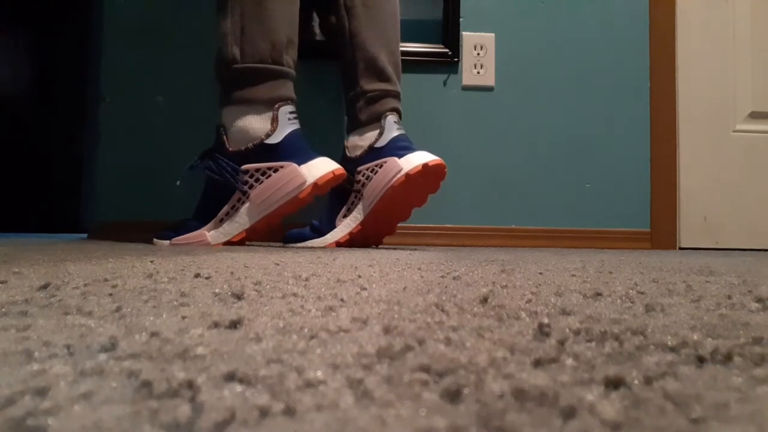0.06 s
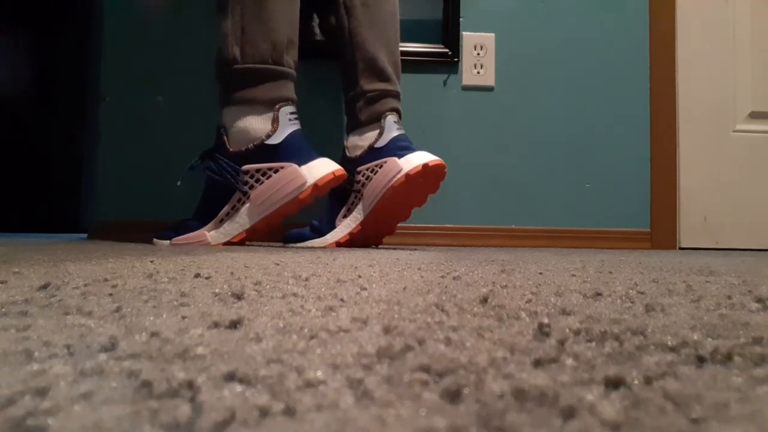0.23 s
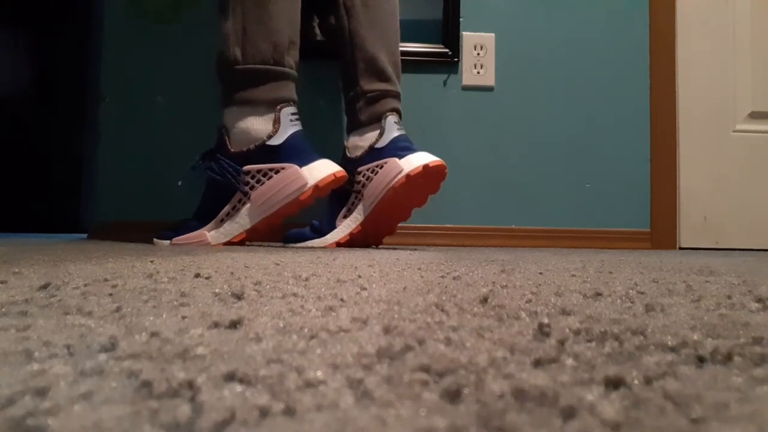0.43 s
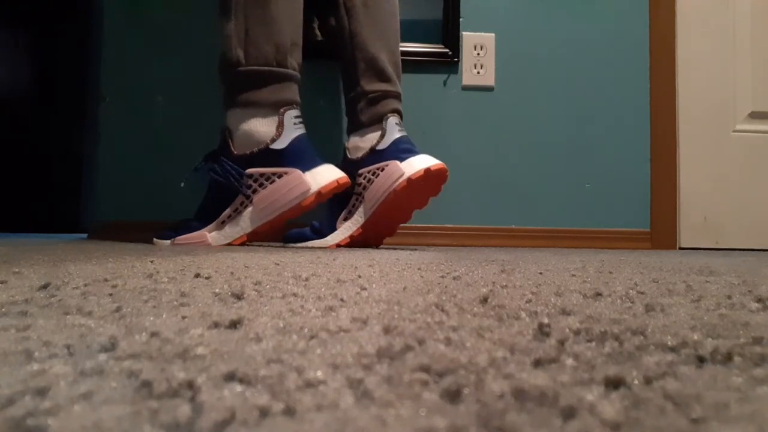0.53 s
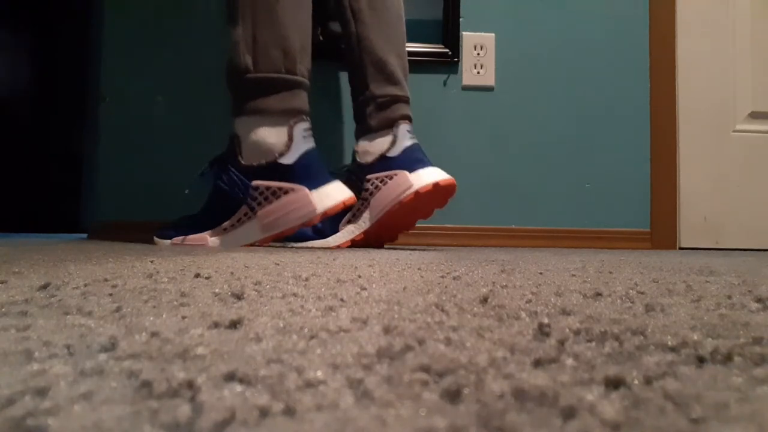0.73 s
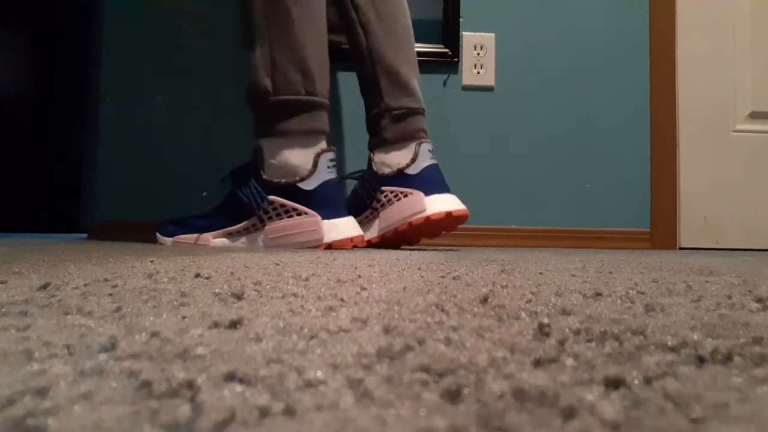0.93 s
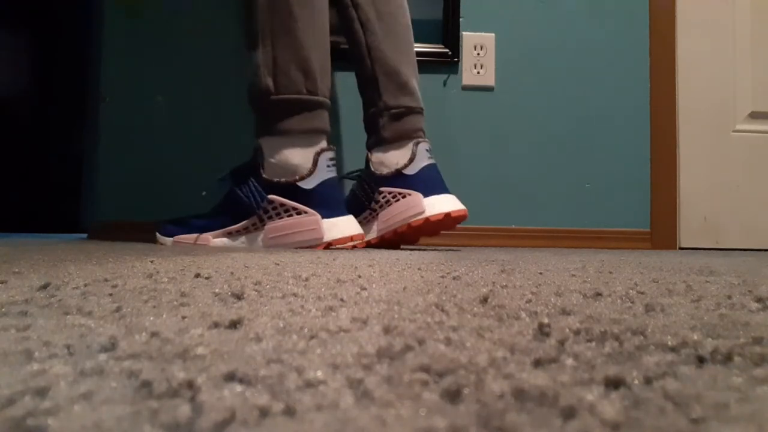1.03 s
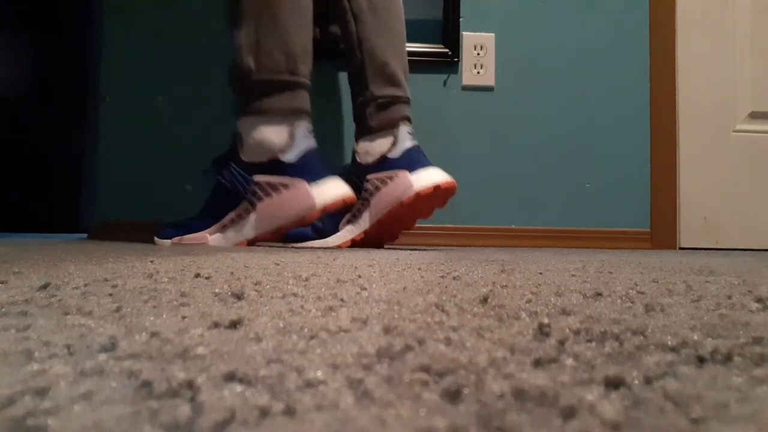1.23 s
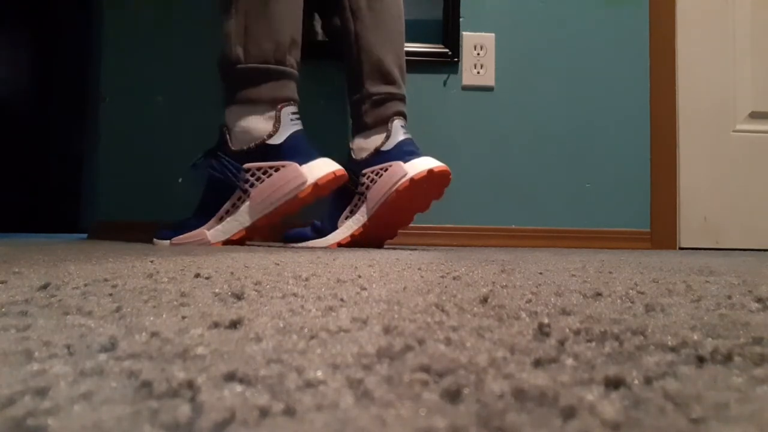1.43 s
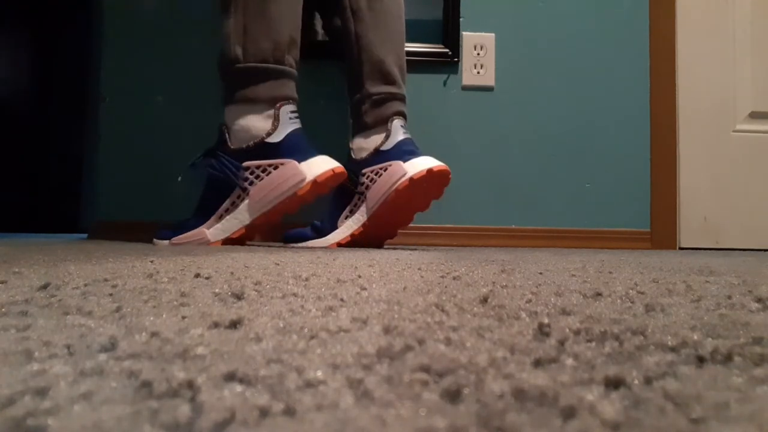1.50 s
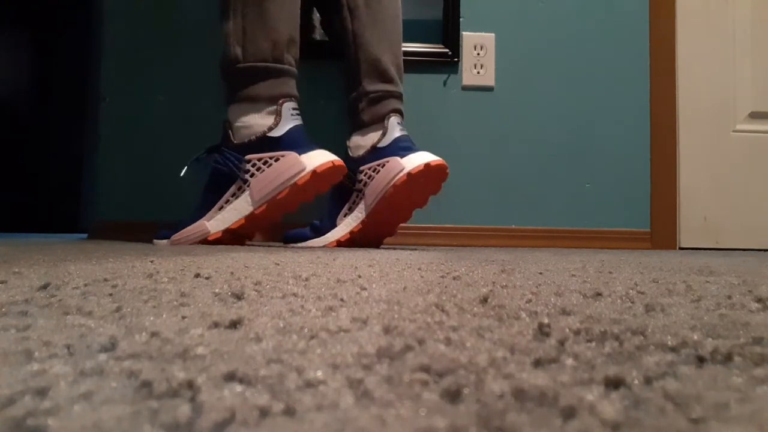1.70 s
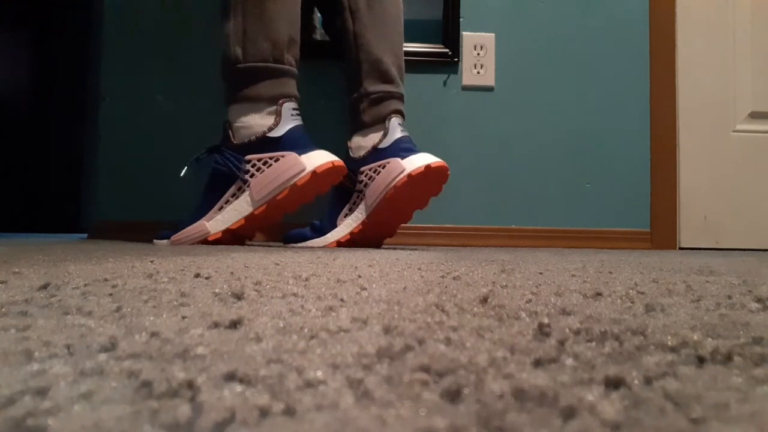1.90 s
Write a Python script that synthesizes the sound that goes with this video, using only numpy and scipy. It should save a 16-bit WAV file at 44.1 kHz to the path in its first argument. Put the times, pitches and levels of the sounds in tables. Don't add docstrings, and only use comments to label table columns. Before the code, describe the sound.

In a small carpeted room, close to a floor-level stereo microphone, one dry crack stands out near the start; afterwards only dull, quiet shoe movements remain beneath a constant low house drone and faint hiss.

```python
import sys
import numpy as np
from scipy import signal
from scipy.fft import rfft, irfft
from scipy.io import wavfile
from scipy.ndimage import uniform_filter1d

SR = 44100
rng = np.random.default_rng(int(sys.argv[2]) if len(sys.argv) > 2 else 0)


def field_ratio(decibels):
    return 10 ** (np.asarray(decibels, dtype=float) / 20)


def digitize_waveform(pressure):
    field = np.atleast_2d(pressure).T
    bounded = np.clip(field, -1, 1)
    quanta = np.round(bounded * 32767).astype(np.int16)
    wavfile.write(sys.argv[1], SR, quanta)


N = 85995

# frequency in Hz, level in dB per Hz.
RUMBLE_SPECTRUM = [(20, -22), (60, -1.5), (100, -0.5), (300, -1.5), (420, -7.5), (580, -13.5), (730, -22.5),
                   (1500, -29)]
# frequency in Hz, likeness from 0 to 1.
RUMBLE_LIKENESS = [(30, .97), (130, .92), (290, .84), (640, .43), (1400, 0), (5000, 0)]
# frequency in Hz, level in dB per Hz.
HISS_SPECTRUM = [(1500, -16), (1900, 1.5), (2600, -5), (5000, -6.5), (9000, -7.5), (12500, -4.5),
                 (15500, -2.5)]
# frequency in Hz, width in Hz, level in dB rms, left-right likeness.
MACHINE_TONES = [(120, .6, -51.5, 1), (152, 6, -61, .9), (172, 10, -62, .9), (344.5, 1.2, -55, .9),
                 (359, 2.5, -59, .9), (600, 6, -80, .6), (964, 6, -80, .3)]
# time in seconds, level in dB.
DRONE_SWELL = [(0.0, -59.5), (0.076, -48), (0.114, -66), (0.206, -51), (0.254, -57), (1.09, -48),
               (1.242, -50.5), (1.314, -68), (1.526, -48), (1.59, -53.5), (1.814, -50), (1.95, -48.5)]
# start in seconds, length in seconds, level in dB, centre in Hz,
# width in Hz.
SCUFFS = [(.01, 0.13, -49, 362, 160), (0.142, .04, -45.5, 346, 160), (0.16, 0.017, -61, 644, 300),
          (0.789, 0.063, -63.5, 700, 300), (0.746, 0.13, -69.5, 1860, 700), (0.905, .1, -82, 1800, 500),
          (1.139, 0.065, -73, 1930, 700), (1.178, .15, -67, 7600, 4500), (1.491, 0.037, -79, 2500, 1500),
          (1.583, .05, -63.5, 1400, 900), (1.588, 0.035, -70, 3200, 1800), (1.675, 0.046, -75, 1920, 900),
          (1.768, .06, -72, 1800, 1200), (1.875, 0.064, -72, 720, 400)]
# start in seconds, level in dB, frequency in Hz, T60 in seconds.
HEEL_THUDS = [
    (.03, -46, 130, .2),
    (.29, -42, 115, .2),
    (.345, -42, 420, .12),
    (.72, -46, 92, .3),
    (1.105, -46, 170, .08),
    (1.39, -47, 151, .4),
    (1.89, -46, 140, .15),
]
# frequency in Hz, width in Hz, peak in dB, delay in seconds.
SNAP_RINGS = [(520, 160, -16, 0), (720, 300, -17, .0002), (1400, 200, -18, .0006), (1780, 450, -8, 0),
              (3200, 1500, -8, 0), (5000, 1200, -7, 0), (6500, 1400, -3, 0), (7700, 1500, -9, .0002),
              (12000, 5000, -13, 0)]
# delay in seconds, left level in dB, right level in dB.
REFLECTIONS = [(0, 0, 1), (.0012, -7, -5), (.0044, 4, -3), (.0062, -4, -12), (.0076, -9, -14),
               (.0117, -14, -9), (.0165, -11, -12), (.0190, -11, -9), (.0235, -14, -11)]
# frequency in Hz, T60 in seconds.
ROOM_T60 = [(200, 0.64), (500, 0.39), (1400, 0.39), (3700, 0.28), (6500, 0.35), (10000, 0.28),
            (15000, 0.33)]
# frequency in Hz, level in dB per Hz.
TAIL_SPECTRUM = [(120, -5), (200, -4), (577, -8), (705, -6.5), (801, -14), (1790, -11.5), (3150, -13.5),
                 (7160, -12), (15700, -25)]
# frequency in Hz, likeness from 0 to 1.
TAIL_LIKENESS = [(200, 0.92), (400, 0.56), (800, 0.17), (2000, 0.1), (8000, 0.038)]
# frequency in Hz, level in dB, rise in seconds, T60 in seconds.
ROOM_MODES = [(142.6, -39, 0.086, .6), (160, -25, 0.029, 0.54), (311, -31.5, 0.075, 0.53),
              (500, -31.5, 0.0036, 0.097), (546, -28.5, 0.0041, 0.13), (592, -28, 0.0041, 0.15),
              (690, -32, 0.012, .08), (1328, -28.5, 0.0093, 0.078), (1740, -22, 0.0027, 0.12),
              (1872, -26, .003, 0.064)]

SNAP_S, SLIP_LEAD_S = .2087, .0028


def evened(x):
    return x / np.sqrt(np.mean(x ** 2) + 1e-20)


def read(points, hz):
    f, value = np.transpose(points)
    return np.interp(np.log(hz + 1), np.log(f + 1), value)


def add(mix, start_s, sound):
    part = mix[..., max(round(start_s * SR), 0):][..., :sound.shape[-1]]
    part += sound[..., :part.shape[-1]]


def resonate(x, hz, width):
    turn = np.exp(2j * np.pi * hz * np.arange(x.shape[-1]) / SR)
    pole = np.exp(-np.pi * width / SR)
    return 2 * (turn * signal.lfilter([1 - pole], [1, -pole], x / turn)).real


def colour(x, db_of_hz):
    hz = np.fft.rfftfreq(x.shape[-1], 1 / SR)
    return irfft(rfft(x) * field_ratio(db_of_hz(hz)), x.shape[-1])


def blend(a, b, same):
    same = np.clip(same, -1, 1)
    return np.array([a, same * a + np.sqrt(1 - same ** 2) * b])


def pair(same, size=N):
    a, b = rng.standard_normal((2, size))
    return blend(a, b, same)


def rumble():
    level_db, patchy_db = -44, 1.5
    hz = np.fft.rfftfreq(2048, 1 / SR)
    a, b, c, d, patches = rng.standard_normal((N // 512 + 5, 1025, 5)).T
    patches = uniform_filter1d(patches, size=10, axis=0)
    patches = evened(uniform_filter1d(patches, size=6, axis=1))
    z = blend(a + 1j * b, c + 1j * d, read(RUMBLE_LIKENESS, hz)[:, None])
    slope = read(RUMBLE_SPECTRUM, hz) - 12 * np.log2(np.maximum(hz / RUMBLE_SPECTRUM[-1][0], 1))
    z = z * field_ratio(slope[:, None] + patchy_db * patches)
    noise = signal.istft(z, nperseg=2048, noverlap=1536)[1][:, :N]
    return field_ratio(level_db - 3.5) * evened(noise)


def hiss():
    def curve(hz):
        return read(HISS_SPECTRUM, hz) - 6 * np.log2(np.maximum(1500 / (hz + 1), 1))
    return field_ratio(-61) * evened(colour(pair(0), curve))


def tones():
    t = np.arange(N) / SR
    out = np.zeros((2, N))
    for hz, width, db, same in MACHINE_TONES:
        noise = pair(same, size=2 * N)
        fuzz = resonate(resonate(noise, hz, width), hz, 2 * width)
        fuzz = evened(fuzz[:, N:])
        steady = np.sqrt(2) * np.sin(2 * np.pi * hz * t)
        share = 1 / (1 + width ** 2)
        out += field_ratio(db) * (np.sqrt(share) * steady + np.sqrt(1 - share) * fuzz)
    drone_hz, wander_hz = 75.2, 1.2
    wobble = evened(resonate(rng.standard_normal(N), 3.8, 6.5))
    drone = np.sin(2 * np.pi * np.cumsum(drone_hz + wander_hz * wobble) / SR)
    return out + np.sqrt(2) * drone * field_ratio(np.interp(t, *np.transpose(DRONE_SWELL)))


def scuff(length_s, db, hz, width):
    n = round(length_s * SR)
    fibres = pair(np.exp(-hz / 900), size=8192)[:, :n]
    crackle = field_ratio(1.2 * rng.exponential(1, 8192)[:n])
    brush = resonate(resonate(fibres * crackle, hz, width), hz, width)
    stroke = np.sin(np.pi * (np.arange(n) / n) ** 0.74)
    return field_ratio(db) * stroke * evened(brush)


def mode(db, hz, t60, rise_s):
    t = np.arange(SR) / SR
    swell = 1 - np.exp(-(t / rise_s) ** 2)
    return field_ratio(db - 60 * t / t60) * swell * np.sin(2 * np.pi * hz * t)


def snap():
    slip_db, crack_db, crack_t60, level_db = -30, -14, .004, -11
    t = np.arange(2048) / SR - SLIP_LEAD_S
    noise = np.diff(rng.standard_normal(2048), prepend=0)
    crack = field_ratio(crack_db - 60 * np.abs(t) / crack_t60)
    sound = noise * np.where(t < 0, field_ratio(slip_db), crack)
    for hz, width, db, delay in SNAP_RINGS:
        u = np.maximum(t - delay, 0) * np.pi * width
        envelope = u * np.exp(1 - u)
        sound = sound + field_ratio(db) * envelope * np.sin(2 * np.pi * hz * (t - delay))
    return field_ratio(level_db) * sound


def early(x):
    taps = np.zeros((2, 2048))
    for k, (delay, left_db, right_db) in enumerate(REFLECTIONS):
        taps[:, round(delay * SR)] = field_ratio([left_db, right_db]) * (-1) ** k
    return signal.fftconvolve(x[None], taps, axes=1)


def room():
    level_db, onset_s = -25.5, .009
    hz, t, z = signal.stft(rng.standard_normal((2, SR)), SR, nperseg=256)
    tone = read(TAIL_SPECTRUM, hz) - 18 * np.log2(np.maximum(200 / (hz + 1), 1))
    decay = 60 * t / read(ROOM_T60, hz)[:, None]
    z = blend(z[0], z[1], read(TAIL_LIKENESS, hz)[:, None]) * field_ratio(tone[:, None] - decay)
    tail = signal.istft(z, SR, nperseg=256)[1][:, :SR]
    tail = tail * np.clip(np.arange(SR) / SR / onset_s, 0, 1) ** .5
    sides = field_ratio([[.8], [-.8]])
    return field_ratio(level_db) * sides * tail / np.sqrt(np.mean(tail[:, :2048] ** 2))


def scene():
    mix = rumble() + hiss() + tones()
    for start, *row in SCUFFS:
        add(mix, start, scuff(*row))
    for start, db, hz, t60 in HEEL_THUDS:
        add(mix, start, mode(db, hz, t60, 0.004)[None])
    add(mix, SNAP_S - SLIP_LEAD_S, early(snap()))
    add(mix, SNAP_S, room())
    for hz, db, rise, t60 in ROOM_MODES:
        add(mix, SNAP_S, mode(db, hz, t60, rise)[None])
    return mix


def band_limit(x):
    return signal.sosfilt(signal.butter(12, 16710, fs=SR, output="sos"), x)


def record(dry):
    edge = signal.firwin(1023, 15700, window=("kaiser", 9), fs=SR)
    mix = signal.oaconvolve(dry, edge[None], "same", axes=1)
    return band_limit(mix)


dry = scene()
out = record(dry)
digitize_waveform(out)
```